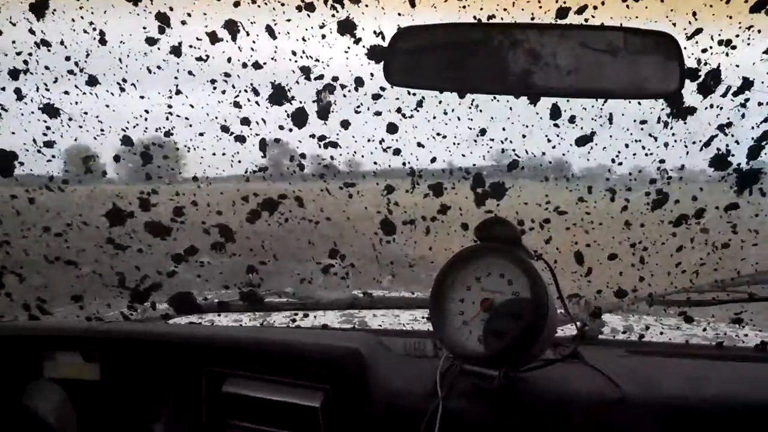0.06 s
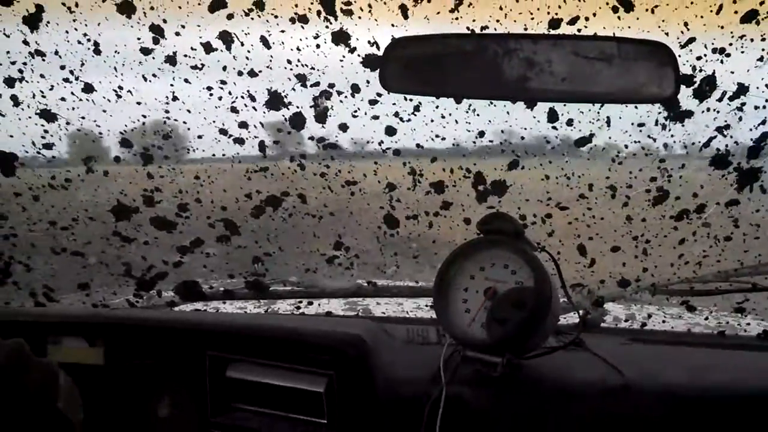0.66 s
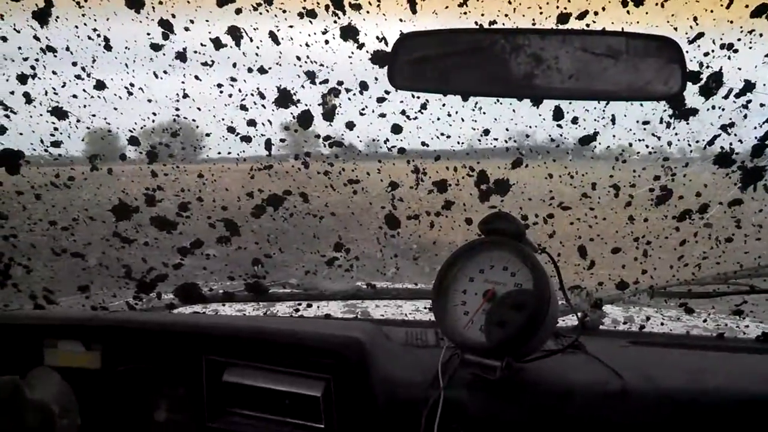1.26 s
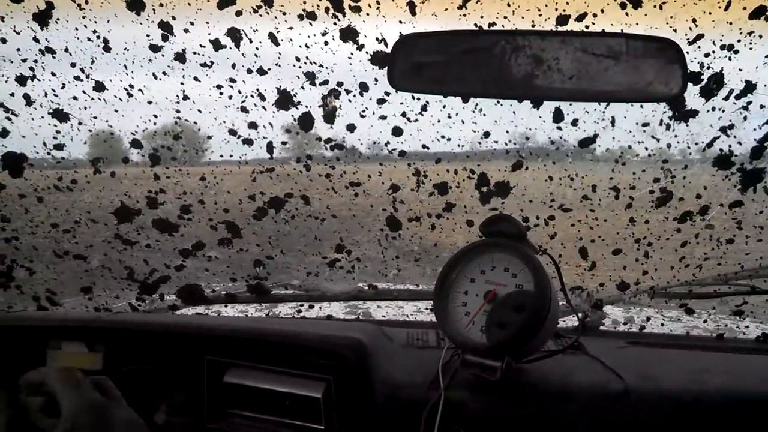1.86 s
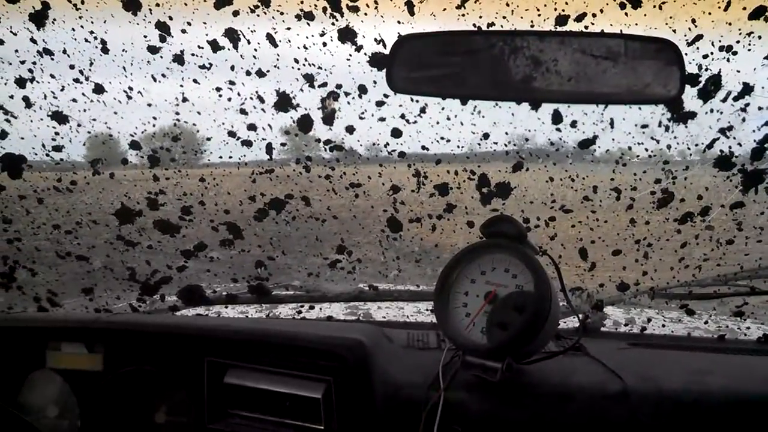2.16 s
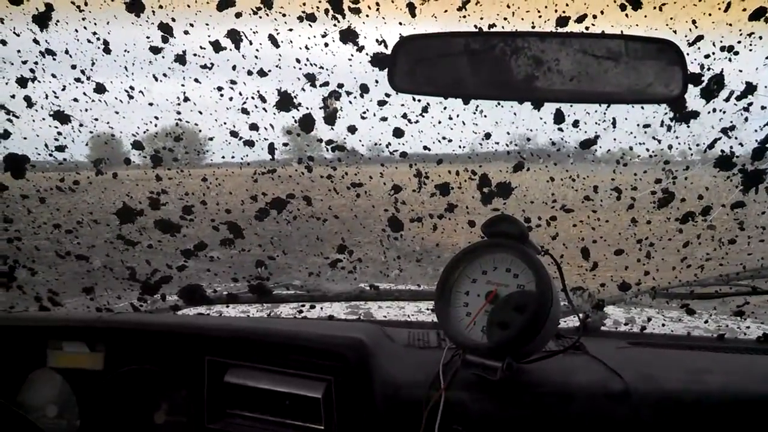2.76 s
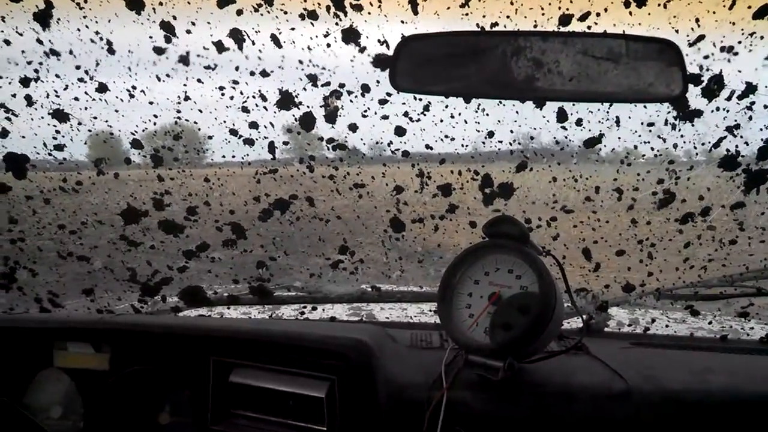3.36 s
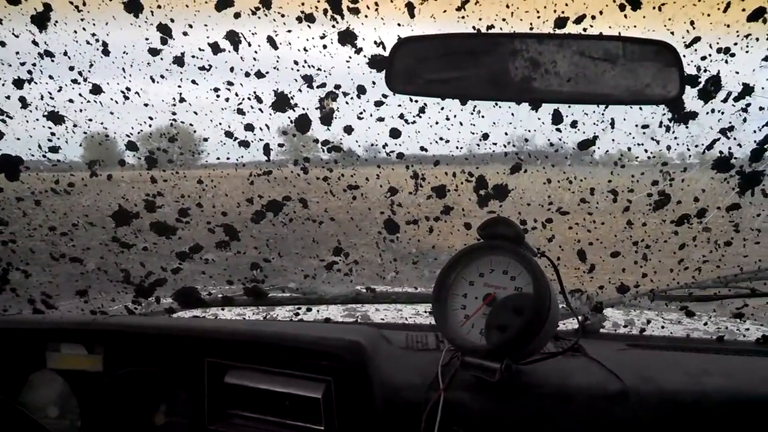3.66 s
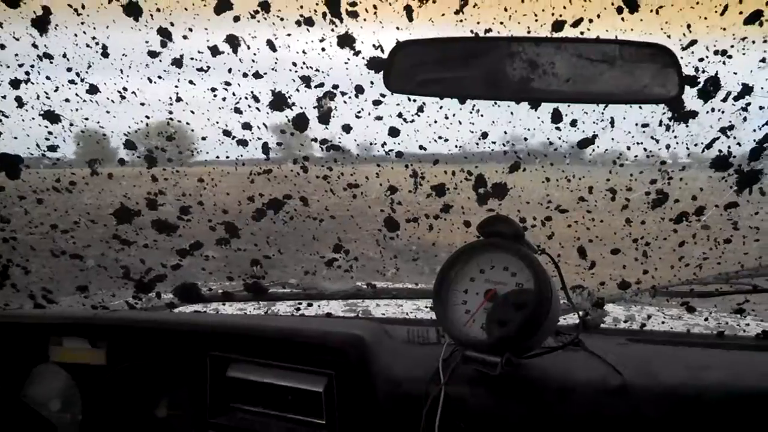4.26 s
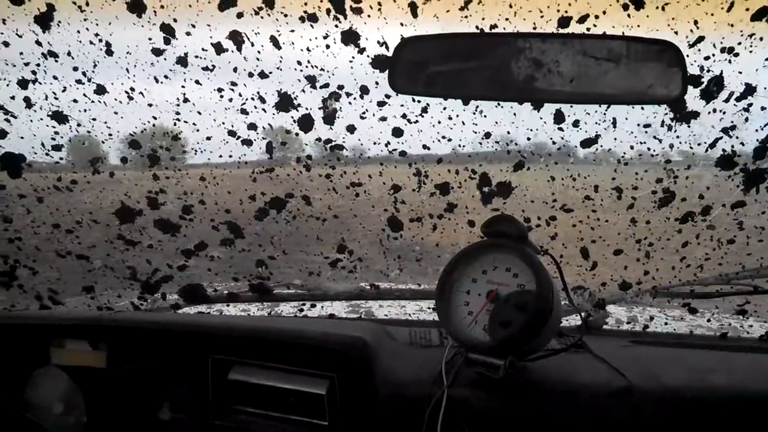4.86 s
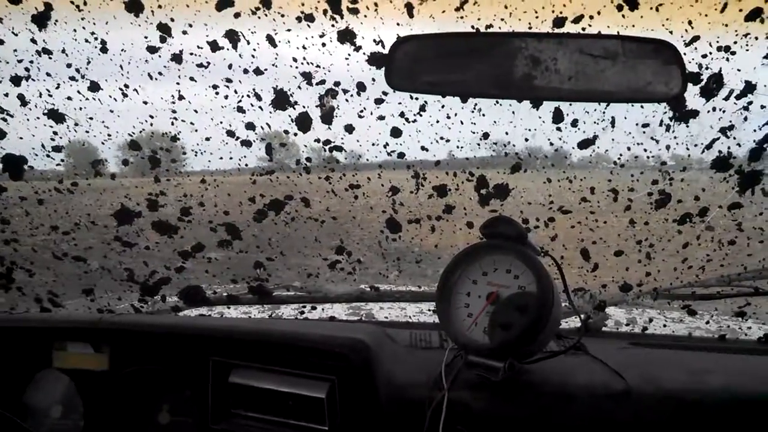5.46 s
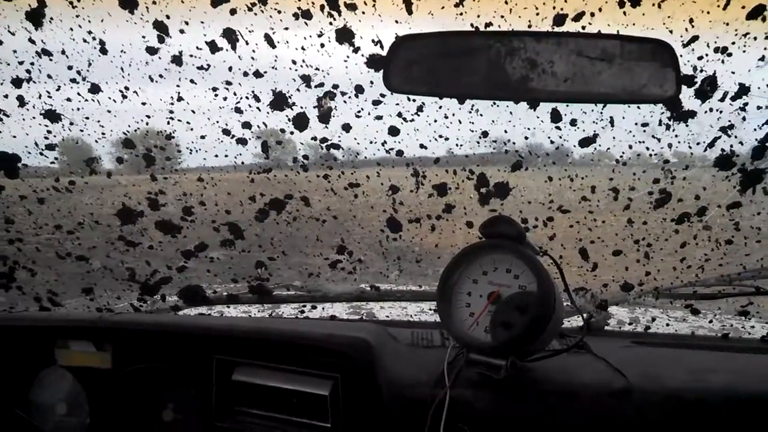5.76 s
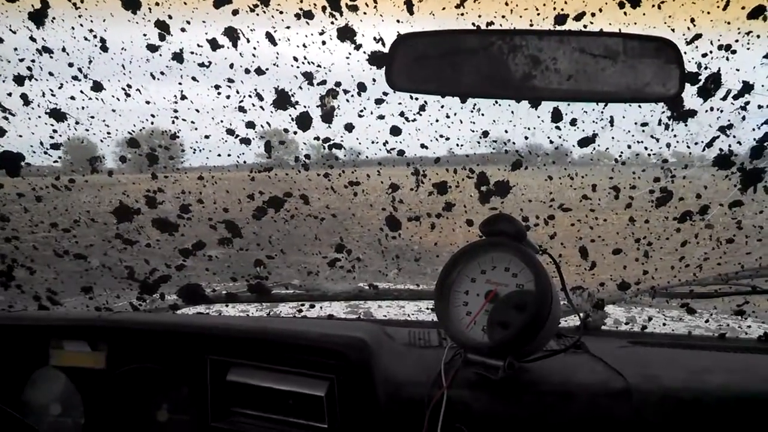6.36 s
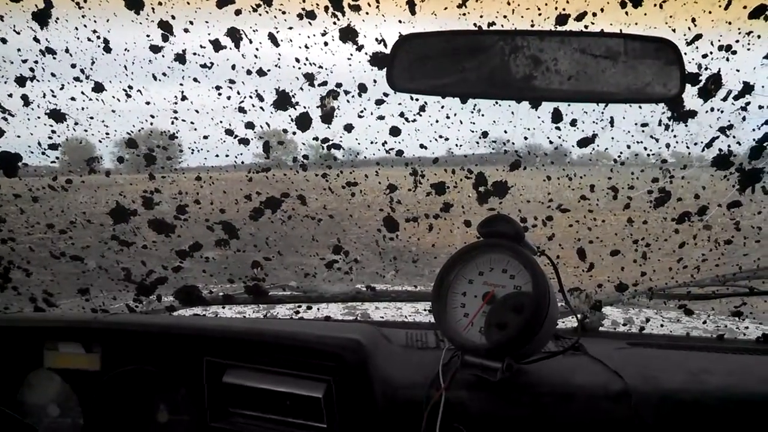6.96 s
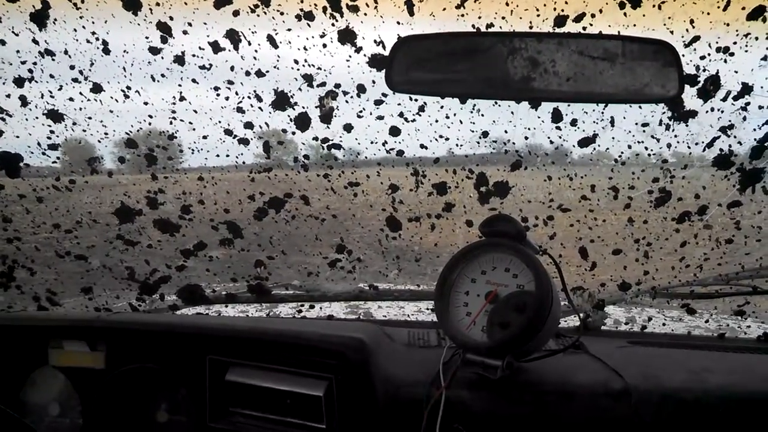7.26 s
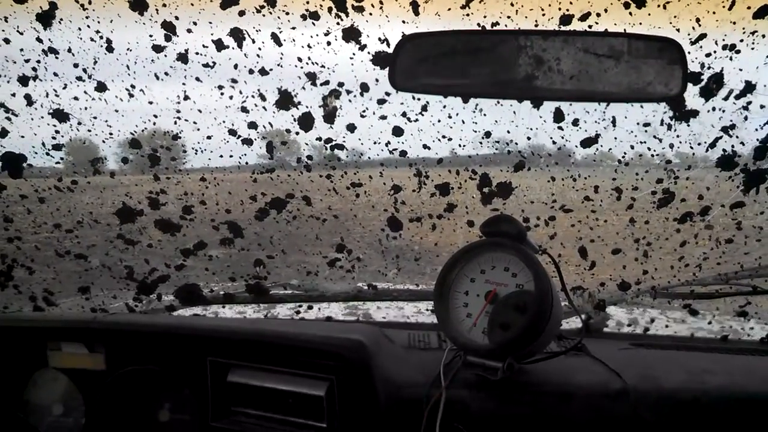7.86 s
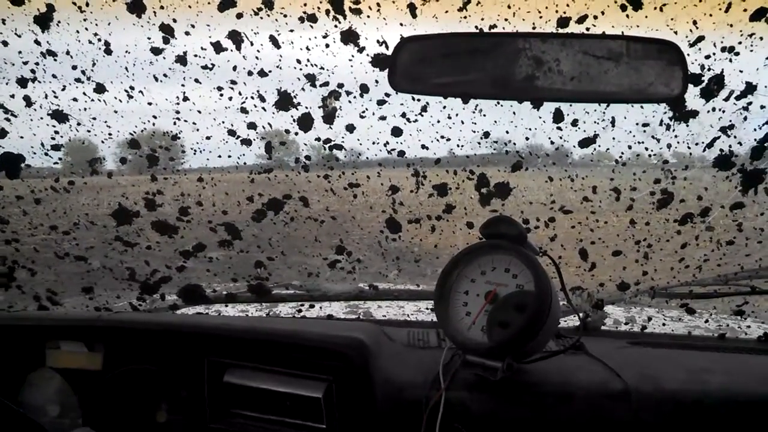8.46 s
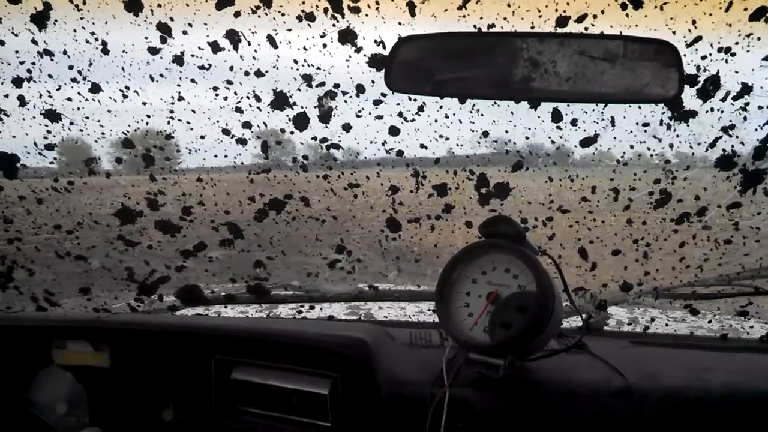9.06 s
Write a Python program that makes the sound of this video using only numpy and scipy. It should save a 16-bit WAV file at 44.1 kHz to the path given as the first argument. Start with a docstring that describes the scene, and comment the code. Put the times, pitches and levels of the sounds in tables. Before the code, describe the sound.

A big eight-cylinder truck engine, heard from inside the cab in a muddy field, drops from high revs and recovers to a heavy, booming lope. It is blipped once, settles again, then sinks to a low shudder near the end. The exhaust growls over a faint intake hiss and floor rumble, while the shaking microphone mount knocks irregularly, most busily at the close.

```python
"""A big eight-cylinder truck engine in a muddy field, heard from inside the cab.
It sags at once, recovers to a heavy lope by 1 s, is blipped at 3.5 s and sinks to a shuddering low
speed after 7 s. Throughout, the floor rumbles, the intake hisses, exhaust puffs growl in the resonances
of pipe and cab, and the firing note booms. The shaking makes the loose microphone mount knock."""
import sys
import numpy as np
from scipy import signal
from scipy.fft import rfft, irfft, next_fast_len
from scipy.io import wavfile
from scipy.ndimage import uniform_filter1d

SR = 44100
rng = np.random.default_rng(int(sys.argv[2]) if len(sys.argv) > 2 else 0)


def inscribe(sig):
    """Save sig as 16-bit PCM at rate SR to the path in sys.argv[1].

    A 1-D sig is mono; a 2-D sig holds one channel per row.
    Samples are clipped to [-1, 1] before scaling.
    """
    pcm = np.round(np.clip(np.atleast_2d(sig).T, -1, 1) * 32767)
    wavfile.write(sys.argv[1], SR, pcm.astype(np.int16))


N = 402191
TIME_S = np.arange(N) / SR
BINS_HZ = np.maximum(np.arange(next_fast_len(N) // 2 + 1) * SR / next_fast_len(N), 1)

# Engine speed. Each row: time in seconds, firing rate in Hz. Eight firings make one cycle.
ENGINE_SPEED = [(0.0, 104.1), (0.09, 100.4), (0.42, 61.9), (0.56, 57.9), (0.96, 76.0), (1.1, 78.1),
                (1.89, 80.7), (2.84, 79.5), (3.27, 80.7), (3.46, 105.4), (3.64, 116.3), (4.02, 87.9),
                (4.37, 78.3), (4.89, 76.8), (5.69, 78.9), (6.52, 76.9), (7.35, 67.7), (8.04, 64.1),
                (9.1, 65.7)]
# Engine pull. Each row: time in seconds, load in dB.
ENGINE_LOAD = [(0, -1), (0.55, -1.5), (0.75, 1), (2, -0.5), (3.2, 0), (3.4, 2), (4.2, 1), (4.7, 0),
               (5.8, 1), (7.25, -0.5), (7.85, 0), (9.1, 0.5)]
# Firing order. Each entry: 1 for the louder near bank, -1 for the far bank.
FIRING_BANKS = [1, -1, -1, 1, -1, 1, 1, -1]
# Brief dips of the engine sound. Each row: start in seconds, depth in dB, hold in seconds.
LEVEL_DIPS = [(0.199, 9.5, 0.061), (0.415, 7, 0.018), (7.97, 4, 0.018), (8.67, 2.5, 0.12)]
# Cab sound field. Each row: frequency in Hz, left over right in dB, left lead in radians, likeness 0-1.
CAB_FIELD = [(60, -4, 3.5, .85), (130, -5, 4.5, .8), (200, -4, 4.2, .2), (330, -2, 1.8, .4),
             (430, -3, 1.0, .4), (580, -1.5, .2, .65), (680, -3, -.3, .8), (850, -1, .4, .75),
             (1300, -1.5, 0, .97)]
# Cab air modes acting on the lope. Each row: frequency in Hz, gain in dB.
CAB_AIR_MODES = [(55, 1), (70, -2.5), (83, 5.5), (98, -18.5), (111, 8.5), (120, 5), (129, 3), (138, -7.5),
                 (142, -2), (150, 9.5), (159, 0), (175, -7.5), (195, 2.5), (212, -5.5), (260, -3), (320, 4)]
# Cab standing waves. Each row: firing rate in Hz, level in dB, left over right in dB, left lead in radians.
STANDING_WAVES = [(59, -21, 0, 3.6), (64.5, -17, -5, 3.4), (67.5, -21.5, -11, 3.6), (71, -24, 7, 4.6),
                  (77, -21.5, 8, 3.9), (79, -17.3, 4, 3.6), (81, -17.5, 3.5, 3.7), (85, -15.5, -2, 3.5),
                  (90, -19, -4.5, 4.2), (104, -18, -4, 4.4), (114, -15, -6, 4.5)]
# Mount hits. Each row: start in seconds, strength in dB.
MOUNT_HITS = [(0.2938, -13), (0.3783, -11), (0.412, -7), (0.5612, -10), (0.6608, -13), (0.6939, -7.5),
              (0.7549, -3.5), (0.7671, -11), (0.8004, -11), (0.8561, -13), (0.8663, -15.2), (1.0531, -8),
              (1.0634, -10), (1.1576, -12), (1.2596, -10.5), (1.2705, -11), (1.4244, -10), (1.4626, -9.5),
              (1.5131, -7.5), (1.615, -14), (1.6249, -11.5), (1.7132, -10.5), (1.8244, -20),
              (3.0629, -12.5), (3.2349, -12), (3.3336, -8.0), (4.0772, -6.5), (4.0883, -11), (4.123, -9.1),
              (4.17, -7), (4.2069, -10.4), (4.2189, -14.1), (4.2799, -11.5), (4.8554, -9.2), (5.5901, -16),
              (5.6787, -6), (5.7814, -9.0), (5.7928, -9), (5.8819, -5), (7.01, -7.5), (7.2803, -15),
              (7.4136, -7.5), (7.5037, -13), (7.5632, -12.2), (7.6077, -6.5), (7.6968, -5), (7.8016, -5.5),
              (7.8932, -2.5), (7.9409, -9.5), (7.9857, -2), (8.1892, -4), (8.3904, -10.2), (8.4377, -5),
              (8.4838, -5.5), (8.5918, -6.5), (8.6382, -5), (8.6843, -0.5), (8.7316, -12.1),
              (8.7783, -12.0), (8.8833, -5), (8.9302, -13.7), (8.9764, -6.5), (9.0225, -8.5), (9.081, -4)]
# Mount thump, crack and housing ring. Each row: frequency in Hz, level in dB, T60 in seconds.
MOUNT_MODES = [(169, 7.5, 0.0089), (565, 5, 0.0053), (3590, -13, 0.0028), (382, -12, 0.046),
               (1330, -22, 0.027), (1512, -21, 0.029), (2373, -27.5, 0.072), (6900, -20, 0.002)]
# Intake hiss. Each row: frequency in Hz, relative density in dB.
HISS_SPECTRUM = [(700, 10), (1600, -1.5), (2500, -3.5), (3300, -2.5), (4050, -3.5), (5000, -5), (7500, -4),
                 (11000, -8), (13500, -4), (15500, -5)]
# Low-speed shudder. Each row: firing harmonic just below the line, level in dB.
SHUDDER_LINES = [(1, -39), (2, -34)]
# Lines of the unequal cylinders. Each row: multiple of the cycle rate, relative level in dB.
LOPE_LINES = [(5, 4), (6, -8), (7, 1), (9, -3), (10, 3.5), (11, 0.5), (12, -9.5), (13, -0.5), (14, 4),
              (15, -0.5), (16, 3.5), (17, -3.5), (18, -5), (19, -12), (20, -12), (21, -6.5), (22, 3),
              (23, -9)]
# Clean exhaust lines. Each row: multiple of the cycle rate, relative level in dB.
PIPE_LINES = [(24, -14), (31, -18), (32, -19), (40, -16), (43, -16), (57, -22), (68, -22), (80, -19),
              (87, -19), (118, -18)]
# Pipe and cab resonances. Each row: centre in Hz, width in Hz, relative level in dB, turn in the cycle 0-1,
# swell at that turn in dB, rise above cruise and sag below it, both in dB per Hz of firing rate.
EXHAUST_RESONANCES = [(216, 36.5, 1.5, 0.63, 3.5, 0.049, 0.1), (299, 53, 0.5, 0.36, 7, 0.068, 0),
                      (395, 76, 0.5, 0.26, 6.5, 0.073, 0.03), (575.3, 59, -3, 0.66, 5.5, -0.025, -0.04),
                      (671.7, 62, 3, 0.64, -5, -0.061, 0.23), (861, 58, -5, 0.79, -5.5, 0.031, 1.87),
                      (1124, 255, -9, 0, 1, 0.15, 1)]

CRUISE_HZ = 77.6  # firing rate


def from_db(db):
    """Decibels to gain."""
    return 10 ** (np.asarray(db) / 20)


def unit_rms(x):
    """Scale to unit power."""
    return x / np.sqrt(np.mean(x ** 2) + 1e-20)


def in_time(rows):
    """A time curve at every sample."""
    return np.interp(TIME_S, *np.transpose(rows))


def at_hz(rows, hz):
    """Table columns read on a log-frequency axis."""
    points_hz, *columns = np.transpose(rows)
    return [np.interp(np.log(hz), np.log(points_hz), c) for c in columns]


def shaped(x, response):
    """Filter by a response given at BINS_HZ."""
    return irfft(rfft(x, next_fast_len(N)) * response, next_fast_len(N))[..., :N]


def cut(x, hz, kind, order=2):
    """Butterworth low- or high-pass."""
    return signal.sosfilt(signal.butter(order, hz, kind, fs=SR, output="sos"), x + 1e-18)


def drift(rate_hz):
    """Slow random motion, unit RMS."""
    hop = 40
    pole = np.exp(-2 * np.pi * hop * rate_hz / SR)
    slow = signal.lfilter([1], [1, -2 * pole, pole * pole], rng.standard_normal(N // hop + 2002))[2000:]
    return np.interp(np.arange(N) / hop, np.arange(len(slow)), unit_rms(slow))


def evened(x, share, span_s):
    """Remove a share of the slow swells; unit RMS."""
    size = int(span_s * SR) + 1
    power = uniform_filter1d(uniform_filter1d(np.mean(x ** 2, axis=0), size), size)
    return unit_rms(x / (np.maximum(power, 0) + 1e-9) ** (share / 2))


def pan(balance_db):
    """Constant-power left and right gains."""
    gains = from_db(np.array([balance_db, -balance_db]) / 2)
    return gains / np.sqrt(np.mean(gains ** 2, axis=0))


def cab(direct, scattered):
    """Cab reflections give each side its own level and phase and make the sides partly unlike."""
    balance_db, lead_rad, likeness = at_hz(CAB_FIELD, BINS_HZ)
    left, right = pan(balance_db)
    shared = shaped(direct, left * likeness * np.exp(1j * lead_rad))
    diffuse = shaped(scattered, left * np.sqrt(1 - likeness ** 2))
    return np.array([shared + diffuse, shaped(direct, right)])


def ports(left, right, lag_s=0.000363):
    """Microphone widening: each port minus the other, delayed."""
    late_left, late_right = (np.interp(TIME_S - lag_s, TIME_S, port) for port in (left, right))
    return np.array([left - late_right, right - late_left])


def dips(fall_s, recover_s):
    """Gain that falls fast, holds and recovers at each dip."""
    db = 0
    for start_s, depth_db, hold_s in LEVEL_DIPS:
        fall = np.clip((TIME_S - start_s) / fall_s, 0, 1)
        released_s = np.maximum(TIME_S - start_s - fall_s - hold_s, 0)
        db -= depth_db * fall * np.exp(-released_s / recover_s)
    return from_db(db)


def swell(cycle, turn, depth_db, sharpness=4.0):
    """Gain that rises or sinks once a cycle, as one cylinder takes its turn."""
    return from_db(depth_db * np.exp(sharpness * (np.cos(2 * np.pi * (cycle - turn)) - 1)))


def puffs(cycle, depth_db, uneven_db):
    """Gas flow swells once per firing; the two banks may differ in strength."""
    firing = 8 * cycle
    bank = np.interp(firing, np.arange(8), FIRING_BANKS, period=8)
    return unit_rms(from_db(depth_db * np.cos(2 * np.pi * firing) + uneven_db * bank))


def floor_rumble(low_hz, high_hz):
    """The running gear shakes the cab floor."""
    shake = cut(rng.standard_normal((2, N)), high_hz, "low")
    return unit_rms(cab(*cut(shake, low_hz, "high")))


def mount_knocks(low_cut_hz, spread_db):
    """The mount hits its stop: a crack and a dead thump at the nearer port, varying per hit."""
    start_s, hit_db = np.transpose(MOUNT_HITS)
    starts = np.minimum(start_s * SR, N - 1).astype(int)
    scatter_db = spread_db * rng.standard_normal((len(starts), len(MOUNT_MODES)))
    out = 0
    for k, (hz, db, t60_s) in enumerate(MOUNT_MODES):
        clicks = np.zeros(N)
        clicks[starts] = from_db(hit_db + db + scatter_db[:, k])
        pole, step_rad = from_db(-60 / (t60_s * SR)), 2 * np.pi * hz / SR
        feedback = [1, -2 * pole * np.cos(step_rad), pole * pole]
        out += (-1) ** k * signal.lfilter([0, np.sin(step_rad)], feedback, clicks + 1e-18)
    return ports(np.zeros(N), cut(out, low_cut_hz, "high"))


def intake_hiss(cycle, far_port_db, flutter_db, whistle_hz, whistle_db):
    """Air hisses past the throttle, one gulp per cylinder; its edge adds a fitful, breathy whistle."""
    air = shaped(rng.standard_normal((2, N)), from_db(at_hz(HISS_SPECTRUM, BINS_HZ)[0]))
    whistle = shaped(rng.standard_normal((2, N)), 1 / (1 + ((BINS_HZ - whistle_hz) / 350) ** 2))
    air += whistle * from_db(whistle_db + 2.8 * drift(24))
    air *= puffs(cycle, depth_db=0.53, uneven_db=0)
    air *= from_db(flutter_db * drift(23.4))
    air *= swell(cycle, turn=0.54, depth_db=-1.5)
    return unit_rms(ports(from_db(far_port_db) * air[0], air[1]))


def shudder(cycle, firing_hz, waver_db, wander_rad, below_hz=67, fade_hz=1.7):
    """At low speed the engine shakes every third firing: a wavering line above each low harmonic."""
    firing = 8 * cycle
    out = 0
    for harmonic, db in SHUDDER_LINES:
        phase = 2 * np.pi * (harmonic + 1 / 3) * firing
        out += from_db(db + waver_db * drift(2.7)) * np.cos(phase + wander_rad * drift(1.7))
    return np.sqrt(2) * out * np.clip((below_hz - firing_hz) / fade_hz, 0, 1)


def lope(cycle, turn, scatter_rad, waver_db, wander_rad):
    """Unequal cylinders make wavering lines that pile up into one chug per cycle."""
    out = 0
    for multiple, db in LOPE_LINES:
        offset_rad = scatter_rad * rng.standard_normal() + wander_rad * drift(1.44)
        phase = 2 * np.pi * multiple * (cycle - turn) + offset_rad
        out += from_db(db + waver_db * drift(2.9)) * np.cos(phase)
    return unit_rms(cut(out, 72, "high", order=4))


def turbulence(cycle, fresh_share, morph_rad, size=1024):
    """Pressure ripple: a slowly changing pattern that repeats each cycle, plus fresh noise."""
    patterns = unit_rms(irfft(np.exp(2j * np.pi * rng.random((2, size // 2 + 1)))))
    one, other = (np.interp(cycle % 1 * size, np.arange(size + 1), np.append(p, p[0])) for p in patterns)
    blend_rad = morph_rad * drift(0.37)
    repeating = one * np.cos(blend_rad) + other * np.sin(blend_rad)
    fresh = np.interp(cycle * size, np.arange(N), rng.standard_normal(N))
    return np.sqrt(1 - fresh_share) * repeating + np.sqrt(fresh_share) * fresh


def pipe_tones(cycle, firing_hz, even_hz=77.7, width_hz=5.3):
    """Near cruise the engine fires evenly enough for a few clean lines."""
    evenness = np.exp(-((firing_hz - even_hz) / width_hz) ** 2)
    return evenness * sum(from_db(db) * np.cos(2 * np.pi * (multiple * cycle + rng.random()))
                          for multiple, db in PIPE_LINES)


def exhaust_growl(cycle, firing_hz, top_hz):
    """Exhaust puffs ring the pipe and cab resonances; each swells or sinks at its own turn."""
    racing_hz, lugging_hz = np.maximum(firing_hz - CRUISE_HZ, 0), np.maximum(CRUISE_HZ - firing_hz, 0)
    flow = puffs(cycle, depth_db=-4.5, uneven_db=1.5)
    drive = np.array([flow * turbulence(cycle, fresh_share=0.1, morph_rad=0.46)
                      + pipe_tones(cycle, firing_hz) for side in range(2)])
    out = 0
    for hz, width_hz, db, turn, swell_db, rise_db_per_hz, sag_db_per_hz in EXHAUST_RESONANCES:
        response = 1 / (1 + 1j * (BINS_HZ - hz * hz / BINS_HZ) / width_hz) ** 2
        ring = evened(shaped(drive, response), share=0.46, span_s=0.33)
        level_db = db + rise_db_per_hz * racing_hz - sag_db_per_hz * lugging_hz
        out += ring * swell(cycle, turn, swell_db) * from_db(level_db)
    return unit_rms(cab(*cut(out, top_hz, "low", order=4)))


def firing_boom(cycle, firing_hz, waver_db):
    """The near-sine firing note swells, fades and pans as it crosses the cab's standing waves."""
    level_db, balance_db, lead_rad = at_hz(STANDING_WAVES, firing_hz)
    phase = 2 * np.pi * 8 * cycle
    note = np.sqrt(2) * np.cos([phase + lead_rad, phase])
    return pan(balance_db) * note * from_db(level_db + waver_db * drift(1.8))


def scene():
    """One crankshaft drives the engine layers; speed and load set their levels."""
    firing_hz, load_db = in_time(ENGINE_SPEED), in_time(ENGINE_LOAD)
    cycle = np.cumsum(firing_hz * (1 + 0.0015 * drift(5))) / SR / 8
    # Above cruise the hiss sinks, 0.12 s late.
    late_racing_hz = np.interp(TIME_S - 0.12, TIME_S, np.maximum(firing_hz - CRUISE_HZ, 0))
    intake_db = -32 + 0.99 * load_db - 0.18 * late_racing_hz
    lope_db, growl_db = -26 + load_db, -25.5 + 0.71 * load_db
    port_gains = pan(balance_db=-1)[:, None]

    boom = firing_boom(cycle, firing_hz, waver_db=0.5)
    throb = cab(*(lope(cycle, turn=0.35, scatter_rad=0.98, waver_db=1, wander_rad=0.27)
                  for side in range(2)))
    chug = from_db(lope_db) * shaped(throb, from_db(at_hz(CAB_AIR_MODES, BINS_HZ)[0]))
    judder = cab(*(shudder(cycle, firing_hz, waver_db=3.5, wander_rad=1) for side in range(2)))
    growl = from_db(growl_db) * exhaust_growl(cycle, firing_hz, top_hz=1027)
    hiss = intake_hiss(cycle, far_port_db=-3.5, flutter_db=1.51, whistle_hz=4100, whistle_db=-1.5)
    engine = boom + chug + judder + growl + from_db(intake_db) * hiss * port_gains
    rumble = from_db(-45) * floor_rumble(low_hz=30, high_hz=106)
    knocks = from_db(-0.5) * mount_knocks(low_cut_hz=96, spread_db=0.8)
    return rumble + knocks * port_gains + engine * dips(fall_s=0.033, recover_s=0.065)


def record(dry):
    """Clip at full scale, then low-pass steeply at 15.7 kHz."""
    low_pass = signal.ellip(10, 0.05, 60, 15700, fs=SR, output="sos")
    return signal.sosfiltfilt(low_pass, np.clip(dry, -1, 1))


dry = scene()
out = record(dry)
inscribe(out)
```